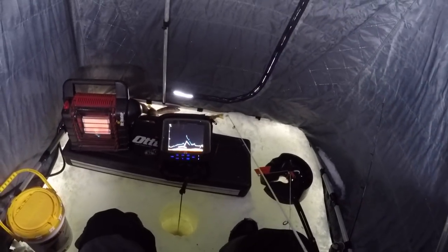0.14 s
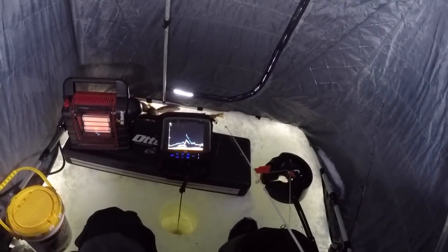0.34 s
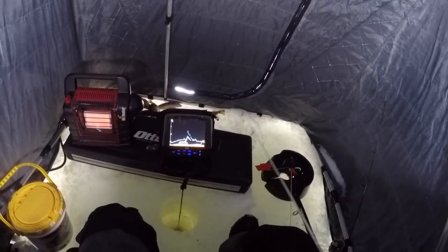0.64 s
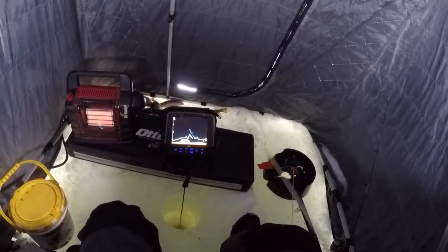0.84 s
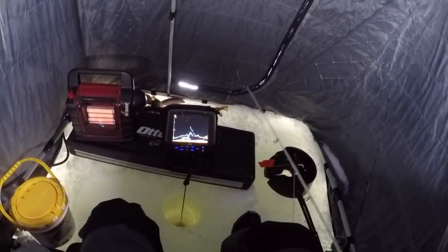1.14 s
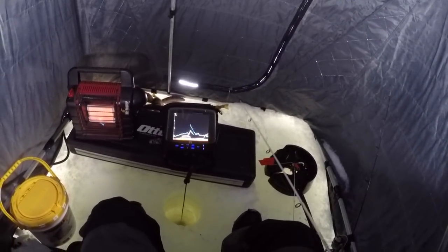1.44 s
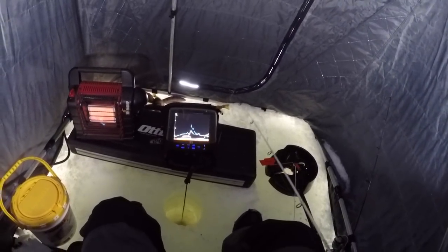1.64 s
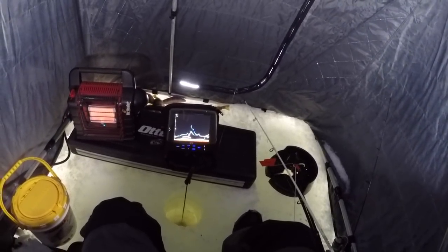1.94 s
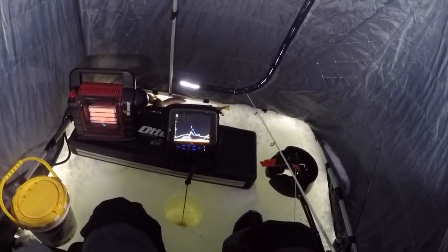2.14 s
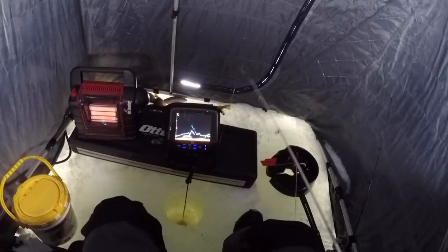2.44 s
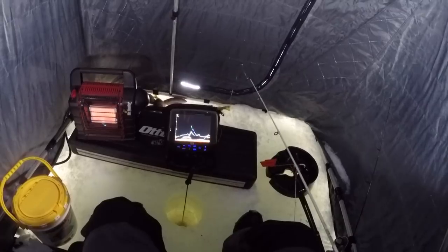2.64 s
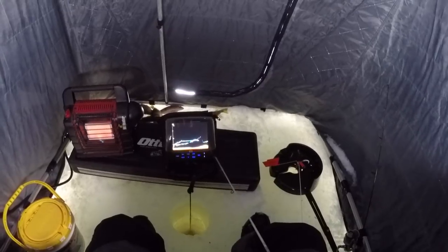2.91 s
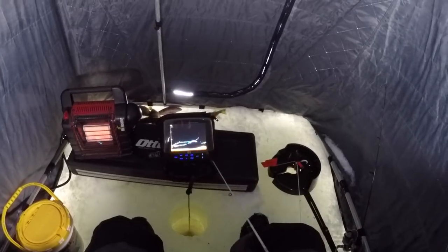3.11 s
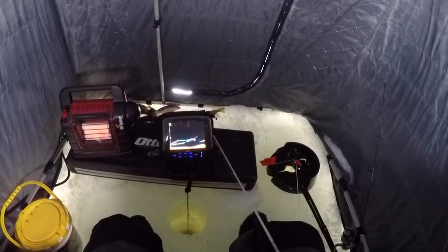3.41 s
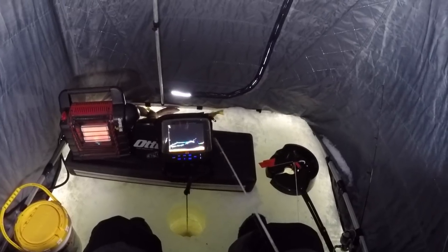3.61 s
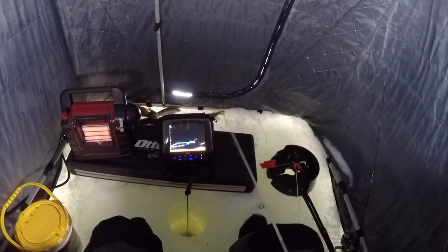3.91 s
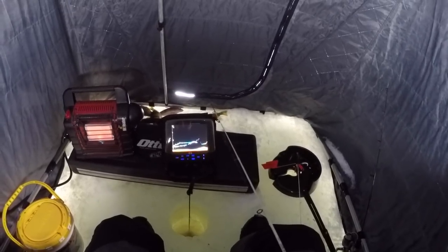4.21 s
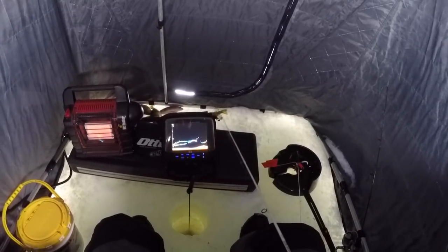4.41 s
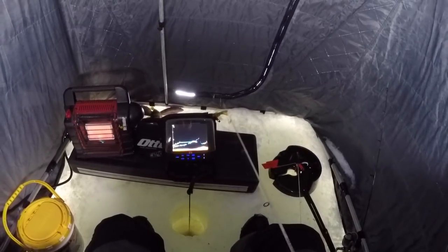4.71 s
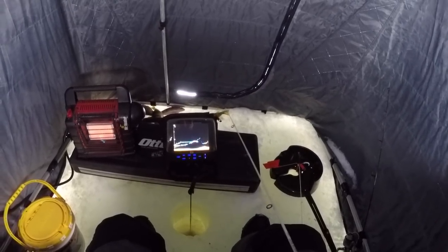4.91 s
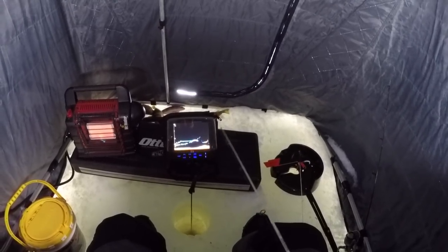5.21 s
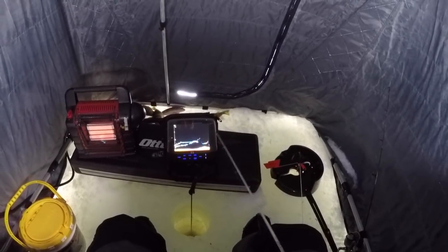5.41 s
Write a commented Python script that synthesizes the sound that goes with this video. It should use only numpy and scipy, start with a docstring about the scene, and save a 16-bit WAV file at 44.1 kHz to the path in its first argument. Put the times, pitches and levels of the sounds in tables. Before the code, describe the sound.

Steady deep heater rumble with a soft hiss, small ticks and cloth rustles, then a loud, bright metal snap late on.

```python
"""Gas heater and fishing rod in an ice-fishing shelter

A small heater rumbles, flutters and hisses: three bands of coloured noise, two following the gas flow.
Near the end a sharp metallic click, likely the reel's bail snapping shut, rings briefly as decaying tones and noise.
Someone handles a rod: the tackle ticks (noise through one resonance) and squeaks (rising tones),
the seat takes soft bumps (dull fading noise) and sleeves rustle (swells of grainy noise)."""
import sys
import numpy as np
from scipy.fft import rfft, irfft, next_fast_len
from scipy.io import wavfile
from scipy.ndimage import map_coordinates

SR = 44100
rng = np.random.default_rng(int(sys.argv[2]) if len(sys.argv) > 2 else 0)


def to_wav(s):
    """Save 16-bit WAV."""
    ch = np.atleast_2d(s).T  # columns
    pcm = np.round(np.clip(ch, -1, 1) * 32767)  # PCM
    wavfile.write(sys.argv[1], SR, pcm.astype(np.int16))


N = 244755
T = np.arange(N) / SR  # time of every sample, s
SHORT_T = np.arange(SR // 4) / SR  # a quarter second, for single knocks and clicks


def amp(db):
    """Turn decibels into gain."""
    return 10 ** (np.asarray(db) / 20)


def unit(x):
    """Scale to an average (rms) strength of 1."""
    return x / np.sqrt(np.mean(x ** 2) + 1e-20)


def curve(points):
    """Follow (time_s, level_db) points with straight lines over the whole scene."""
    times_s, levels_db = np.transpose(points)
    return np.interp(T, times_s, levels_db)


def shape(points):
    """Gain as a function of frequency, through (frequency_hz, level_db) points on a log axis."""
    f, db = np.transpose(points)
    return lambda hz: amp(np.interp(np.log(hz + 1), np.log(f), db))


def filtered(x, response):
    """Weight each frequency of x by a response."""
    m = next_fast_len(len(x) + 8192)  # padded, so the end does not wrap onto the start
    spectrum = rfft(x, m) * response(np.fft.rfftfreq(m, 1 / SR))
    return irfft(spectrum, m)[:len(x)]


def noise(response, size=N):
    """Random noise coloured by a response, scaled to rms 1."""
    return unit(filtered(rng.standard_normal(size), response))


def wobble(rate):
    """A smooth random curve through rate random points a second."""
    points = rng.standard_normal(int(N * rate / SR) + 4)
    return map_coordinates(points, [T * rate], mode="nearest")


def fade(t, t60):
    """Die away freely, by 60 dB in t60 seconds."""
    return np.exp(-np.log(1000) * t / t60)


def rise(t, time_s):
    """Climb smoothly from 0 towards 1, with time constant time_s."""
    return 1 - np.exp(-t / time_s)


def add(track, s, sound):
    """Mix a sound into the track at time s."""
    part = track[round(s * SR):][:len(sound)]
    part += sound[:len(part)]


# tone colour of the burning rumble: frequency_hz, level_db (per Hz, relative)
RUMBLE_COLOUR = [(8, -12.5), (18, -1), (30, 1.5), (55, .5), (72, -2.5), (95, -9), (125, -11.5), (170, -23),
                 (300, -56)]
# level of the rumble, nearly steady with slight random drift: time_s, level_db
RUMBLE_DRIFT = [(0.0, -28.5), (2.1, -26.5), (2.4, -28), (3.6, -29), (5.55, -28.6)]
# tone colour of the flame's flutter: frequency_hz, level_db (per Hz, relative)
FLUTTER_COLOUR = [(100, -10), (170, -3), (255, 2), (315, -1.5), (390, -6), (570, -6), (720, -12.5),
                  (900, -19), (1400, -30.5), (3000, -44)]
# tone colour of the gas jet's hiss: frequency_hz, level_db (per Hz, relative)
HISS_COLOUR = [(400, -36), (1000, 2.5), (1700, -0.5), (2400, 1.5), (3600, 1.5), (4700, -1.5), (6400, -0.5),
               (7200, -8), (8600, -5.5), (9500, -10), (10700, -5.5), (11500, -12.5), (15000, -13.5)]
# the gas flow sags and recovers a little: time_s, strength_db (around its usual strength)
GAS_FLOW = [(0.0, 0.5), (0.5, 0), (0.9, 0.95), (1.3, -0.3), (2.15, -.3), (2.9, 0.64), (3.7, -0.15),
            (4.6, -0.72), (5.55, -0.63)]
FLUTTER_DB, HISS_DB = -41.5, -49.7  # levels at the usual flow
FLUTTER_GROWS = 2.1  # dB of flutter for each dB of flow; the hiss follows it one to one
FLICKER_RATE, FLICKER_DB = 9, 1.0  # the flame's restlessness: random points a second, typical depth in dB


def heater():
    """Turbulent burning rumbles; the flame's flutter and the jet's even hiss both follow the gas flow."""
    flow_db = curve(GAS_FLOW)
    rumble = noise(shape(RUMBLE_COLOUR)) * amp(curve(RUMBLE_DRIFT))
    flutter = noise(shape(FLUTTER_COLOUR)) * amp(FLUTTER_DB + FLUTTER_GROWS * flow_db)
    hiss = noise(shape(HISS_COLOUR)) * amp(HISS_DB + flow_db)
    flicker_db = FLICKER_DB * wobble(FLICKER_RATE)
    # the flame is restless, the jet hardly so
    return rumble + flutter * amp(flicker_db) + hiss * amp(0.1 * flicker_db)


# the bail strikes its stop and rebounds: start_s, level_db (shared by all parts of a strike)
SNAP_STRIKES = [(4.8284, -8), (4.8345, -15)]
# ringing tones of bail and reel body: pitch_hz, level_db (relative), t60_s (time to fade 60 dB)
REEL_TONES = [(633, -7.5, 0.059), (721, -14, 0.091), (1055, -11, .05), (1230, -9.5, 0.036),
              (1724, -9, 0.079), (1830, -11, 0.087), (2024, -7, 0.081), (2110, -3.5, .1), (2186, -1, 0.096),
              (2233, 1, 0.1), (2282, -5.5, 0.13), (2750, -10.5, 0.14), (4330, -26, 0.082),
              (5544, -9, 0.098), (5685, -11, .09), (5900, -7, .09), (6040, -7, .085), (6130, -12, .085),
              (6480, -6, 0.074), (6607, -4, 0.077), (8500, -12, .1), (8865, -16, .09), (9720, -4.5, 0.094),
              (9900, -12, 0.095), (10640, -5, 0.064), (14000, -10, .08)]
# tone colour of the crowd of finer resonances: frequency_hz, level_db (per Hz, relative)
CLATTER_COLOUR = [(400, -20), (1100, -13), (1500, -5.5), (2200, -1), (3100, -5), (5100, -2), (5800, 6.5),
                  (6700, 3.5), (7200, -3.5), (8600, -2), (10300, 1.5), (12200, -8), (14000, -4.5),
                  (15300, -11)]
RING_DB, WASH_DB, CRACK_DB = -4.0, -0.5, 5  # balance of the parts within a strike


def bail():
    """The first strike sets the reel ringing; each one cracks and leaves a wash the fabric soon absorbs."""
    out, t = np.zeros(N), SHORT_T
    contact = rise(t, 0.00077)
    ring = np.zeros(len(t))
    for pitch_hz, level_db, t60_s in REEL_TONES:
        gain = amp(level_db + rng.normal(0, 1))  # each tone varies by about 1 dB
        ring += gain * fade(t, t60_s) * np.sin(2 * np.pi * (pitch_hz * t + rng.random()))
    first_s, first_db = SNAP_STRIKES[0]
    add(out, first_s, amp(first_db + RING_DB) * ring * contact)
    for start_s, level_db in SNAP_STRIKES:
        wash = noise(shape(CLATTER_COLOUR), size=len(t)) * fade(t, .11)
        crack = noise(shape(CLATTER_COLOUR), size=len(t)) * fade(t, 0.0072)
        strike = amp(WASH_DB) * wash + amp(CRACK_DB) * crack
        add(out, start_s, amp(level_db) * strike * contact)
    return out


# small knocks of the tackle: start_s, level_db (before rise and fade), pitch_hz
TICKS = [(.206, -44, 3700), (1.541, -44, 4080), (2.391, -47.5, 7500), (2.951, -38.5, 3420),
         (3.031, -40, 3450), (3.236, -43.5, 2700), (4.192, -28.5, 5360), (4.223, -37.5, 2860),
         (4.274, -39, 3500), (4.521, -40.5, 3000), (4.586, -40, 4000), (4.683, -42, 6360),
         (4.797, -39, 5600), (4.8062, -29, 10500), (4.824, -25, 6000)]
TICK_T60_S, TICK_RISE_S = 0.064, .0018  # fading time and rise of every tick
LIGHT_TICK_DB, LIGHT_WIDTH_HZ = -40.5, 810  # level and bandwidth of a light tick
WIDTH_GROWS = 1.4  # dB of bandwidth for each dB of force


def tackle():
    """Contacts wake one resonance, smeared by the close walls; a harder one spreads into a broad click."""
    out, t = np.zeros(N), SHORT_T
    for start_s, level_db, pitch_hz in TICKS:
        width_hz = LIGHT_WIDTH_HZ * amp(WIDTH_GROWS * (level_db - LIGHT_TICK_DB))

        def resonance(hz):
            """Let through most at the pitch, less to either side."""
            return hz * width_hz / np.hypot(pitch_hz ** 2 - hz ** 2, hz * width_hz)

        ring = noise(resonance, size=len(t))
        add(out, start_s, amp(level_db) * ring * fade(t, TICK_T60_S) * rise(t, TICK_RISE_S))
    return out


# soft knocks on the seat: start_s, level_db (before rise and fade)
BUMPS = [(.12, -23), (.158, -26), (2.985, -32), (3.955, -30.5)]
# dull tone colour of the padded seat: frequency_hz, level_db (per Hz, relative)
SEAT_COLOUR = [(60, -10), (130, 3.5), (280, 4), (400, -10), (600, -9), (800, -28.5), (1100, -14.5),
               (1500, -36), (2500, -48)]


def seat():
    """Padded bumps: a soft rise and a dull, short boom."""
    out, t = np.zeros(N), SHORT_T
    for start_s, level_db in BUMPS:
        boom = noise(shape(SEAT_COLOUR), size=len(t))
        add(out, start_s, amp(level_db) * boom * fade(t, 0.097) * rise(t, 0.0026))
    return out


# sleeve strokes: middle_s, half_length_s, level_db (at the middle)
STROKES = [(0.16, .05, -53), (.5, 0.13, -57.5), (2.97, .025, -50), (3.003, 0.012, -45), (3.045, 0.023, -45),
           (3.994, 0.023, -46), (4.075, .012, -49), (4.21, 0.033, -44), (4.29, 0.041, -46),
           (4.435, 0.038, -50.5), (4.564, 0.033, -50), (5.035, .08, -50)]
# tone colour of rubbed cloth: frequency_hz, level_db (per Hz, relative)
CLOTH_COLOUR = [(300, -7), (1100, 4.5), (1800, 2), (3000, 5), (6000, -0.5), (10000, -2), (15000, -2.5)]
PLAIN_STROKE_S = 0.022  # half length of a stroke that has exactly the cloth's tone colour
DULLING_DB = 1.9  # treble slope lost (dB per octave) each time the half length doubles


def sleeves():
    """Each stroke is a swell of catching fibres; quicker rubbing is brighter."""
    out = np.zeros(N)
    for middle_s, half_s, level_db in STROKES:
        tilt_db = -DULLING_DB * np.log2(half_s / PLAIN_STROKE_S)  # per octave

        def tilted_cloth(hz):
            """The cloth's colour, tilted above 900 Hz."""
            octaves = np.log2(np.maximum(hz, 900) / 3000)
            return shape(CLOTH_COLOUR)(hz) * amp(tilt_db * octaves)

        swell = np.exp(-.5 * ((T - middle_s) / half_s) ** 2)
        out += amp(level_db) * noise(tilted_cloth) * swell
    grain = unit(amp(3.4 * wobble(160)))
    return out * grain


# brief squeaks of rubbed tackle: start_s, length_s, level_db, start_pitch_hz
SQUEAKS = [(0.098, 0.13, -52.3, 2380), (1.96, 0.024, -51, 2470), (2.582, 0.02, -49.5, 6150),
           (2.951, 0.013, -39, 3420), (4.563, .028, -49, 3600)]
SQUEAK_RISE, TIGHTEN_S = .15, .06  # share the pitch climbs towards, and the time constant of the climb


def squeaks():
    """Sticking and slipping gives a thin, grainy tone that rises ever more slowly as it tightens."""
    out = np.zeros(N)
    for start_s, length_s, level_db, start_hz in SQUEAKS:
        age = np.clip(T - start_s, 0, length_s)
        pitch_hz = start_hz * (1 + SQUEAK_RISE * rise(age, TIGHTEN_S))
        pitch_hz = pitch_hz * (1 + .055 * wobble(900))  # fast random shaking roughens the tone
        grip = np.sqrt(np.abs(np.sin(np.pi * age / length_s))) * amp(3.4 * wobble(140))
        tone = np.sqrt(2) * np.sin(2 * np.pi * np.cumsum(pitch_hz) / SR)  # rms 1
        out += amp(level_db) * grip * tone
    return out


def scene():
    """Add up everything within arm's reach, as one channel."""
    return (heater() + bail() + tackle() + seat() + sleeves() + squeaks())[None]


TOP_HZ = 15400  # upper limit of the sound


def record(dry):
    """Round off peaks near full scale, then keep nothing from the upper limit upwards."""
    rounded = dry[0] / (1 + np.abs(dry[0]) ** 6) ** (1 / 6)
    return filtered(rounded, lambda hz: hz < TOP_HZ)[None]


dry = scene()
out = record(dry)
to_wav(out)
```